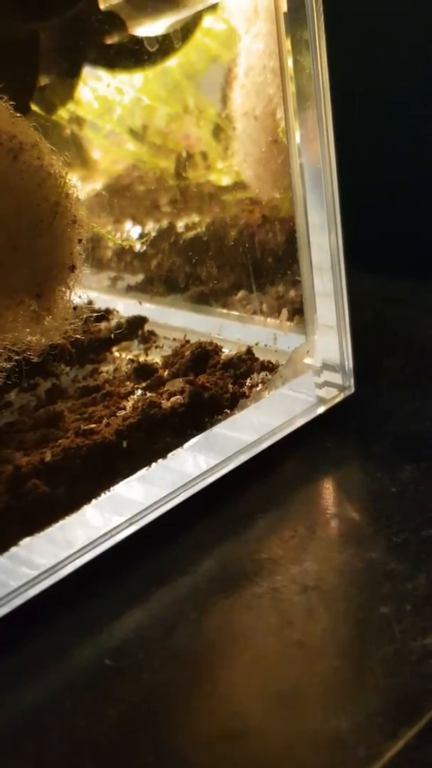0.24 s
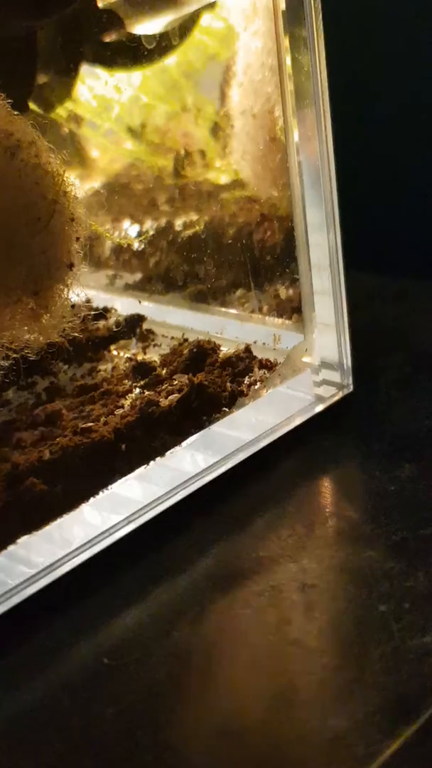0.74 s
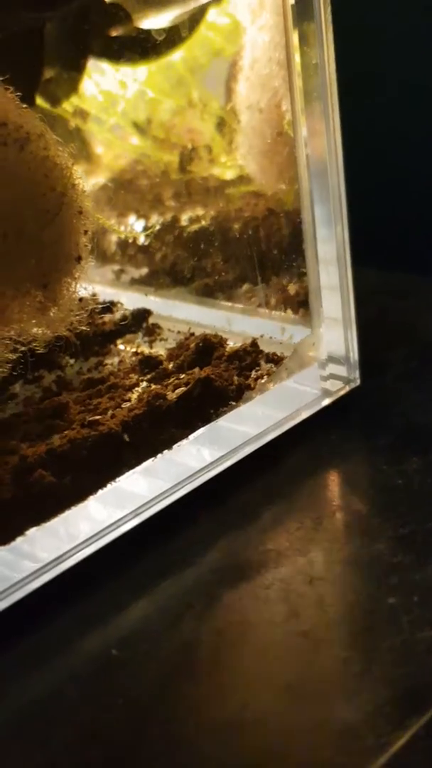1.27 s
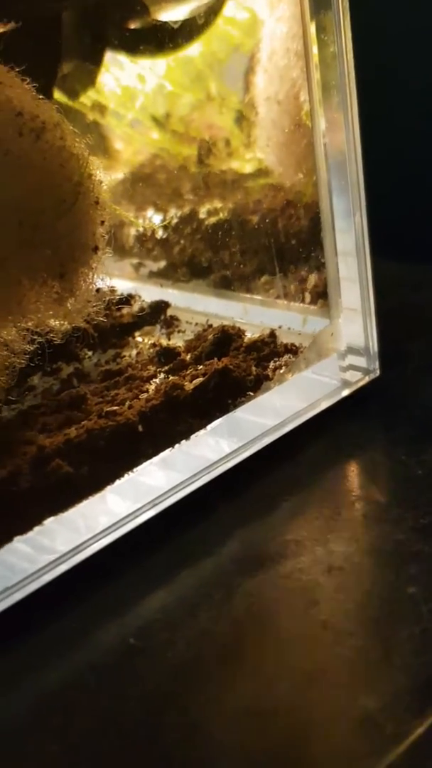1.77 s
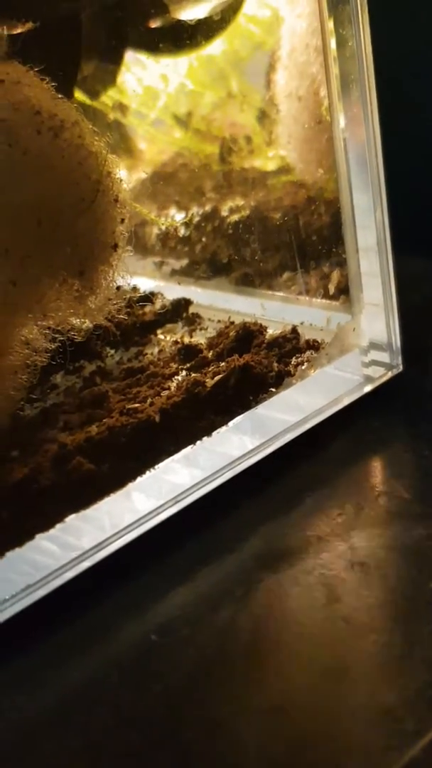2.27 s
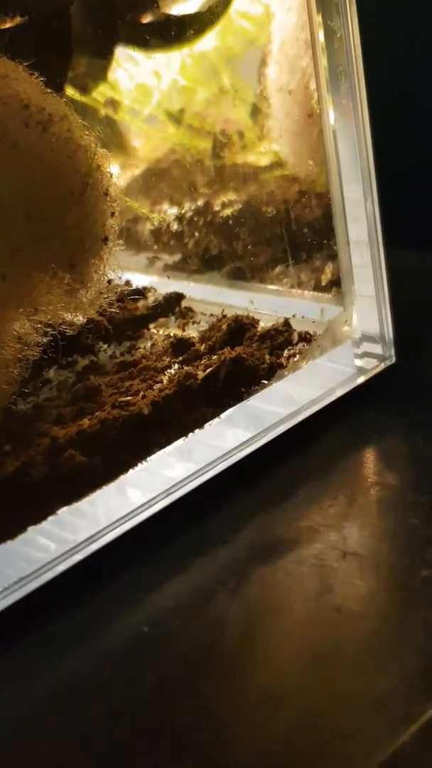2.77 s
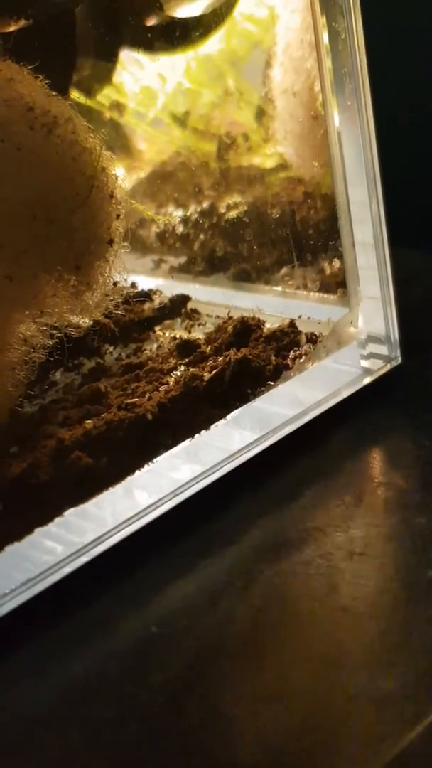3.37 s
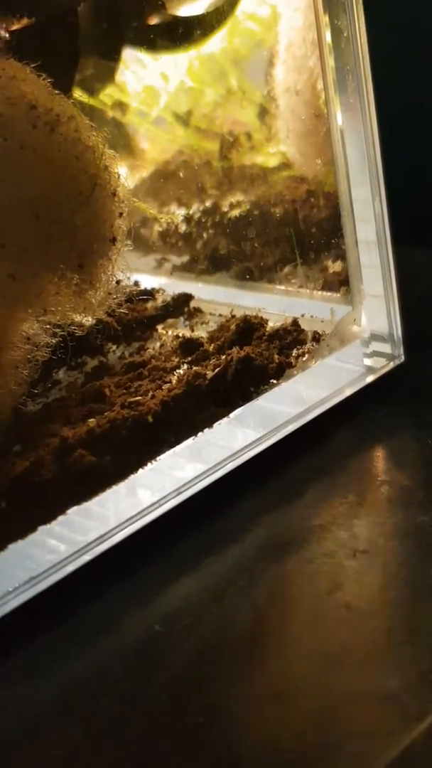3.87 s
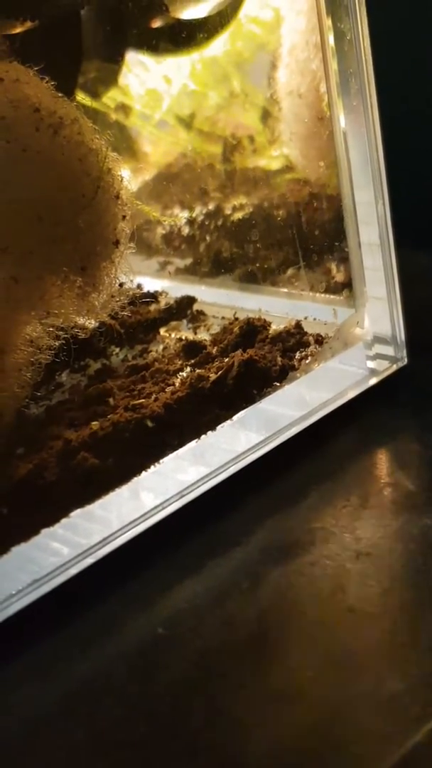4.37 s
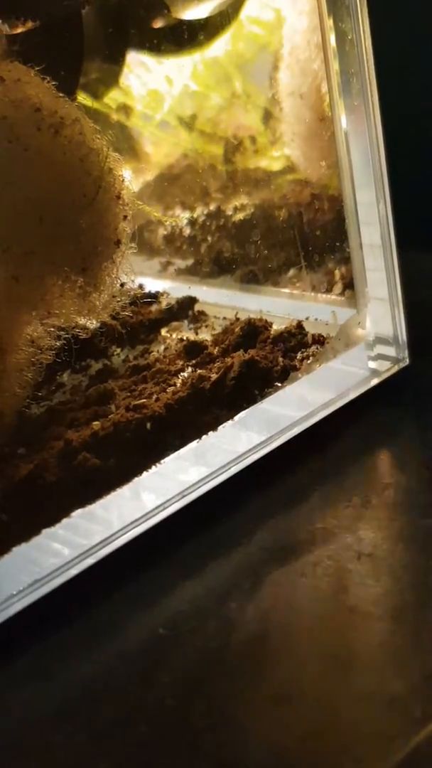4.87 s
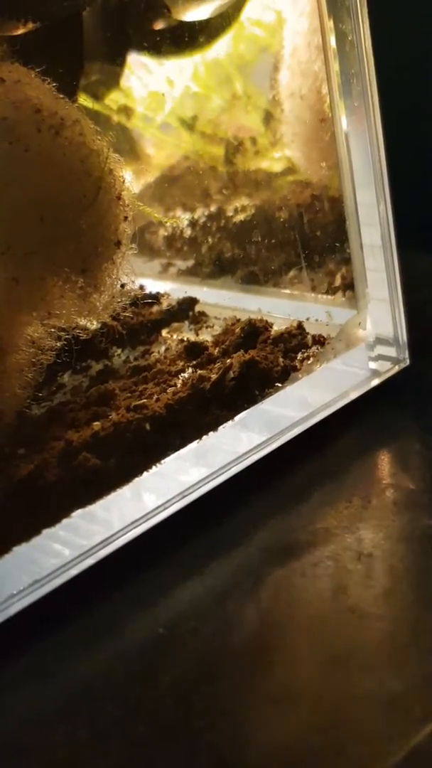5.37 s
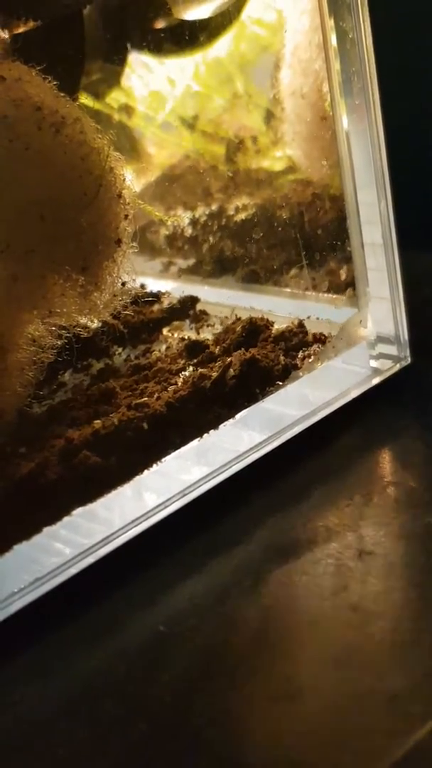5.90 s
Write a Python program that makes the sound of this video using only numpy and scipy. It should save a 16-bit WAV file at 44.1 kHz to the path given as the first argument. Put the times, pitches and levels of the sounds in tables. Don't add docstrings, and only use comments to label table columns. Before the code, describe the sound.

Close, continuous aquarium bubbling with hollow glassy plips and tiny crisp surface pops, while an air pump hums low and steady behind.

```python
import sys
import numpy as np
from scipy import signal
from scipy.fft import rfft, irfft, next_fast_len
from scipy.io import wavfile
from scipy.ndimage import uniform_filter1d, map_coordinates

SR = 44100
rng = np.random.default_rng(int(sys.argv[2]) if len(sys.argv) > 2 else 0)


def materialize(psi):
    bounded = np.clip(np.atleast_2d(psi).T, -1, 1)
    quanta = np.round(bounded * 32767).astype(np.int16)
    wavfile.write(sys.argv[1], SR, quanta)


def rack_gain(trim_db):
    fader = np.asarray(trim_db, float)
    return 10 ** (fader / 20)


N = 270774

# f/Hz, level/dB [per Hz]
STREAM_TONE = [(100, -5.5), (1200, 0), (1500, -4.5), (2400, -3), (3000, -0.5), (8000, -6)]
# t/s, level/dB [peak], f/Hz, life [cycles]
LARGE_BUBBLES = [(0.0, -39.5, 1680, 5.6), (0.047, -38, 1570, 9.1), (0.191, -48, 1680, 16),
                 (0.576, -41.5, 1670, 17), (0.8075, -33, 1650, 8.7), (1.4698, -40, 1550, 13),
                 (1.6033, -47, 1710, 12), (1.692, -41, 4200, 5), (1.7465, -37.5, 2430, 14),
                 (1.978, -37, 2340, 10), (2.0214, -38.5, 1580, 15), (2.3858, -47, 2340, 16),
                 (2.4435, -34, 1730, 27), (2.4942, -38, 2230, 16), (2.6428, -52, 1750, 14),
                 (3.272, -41, 2135, 17), (3.9617, -35, 1730, 22), (4.2063, -45.5, 1460, 13),
                 (4.445, -46, 1850, 16), (4.8474, -42.5, 1476, 14), (5.1588, -43, 1904, 18),
                 (5.4412, -36, 1840, 13), (5.7593, -36.5, 2190, 13), (6.0048, -42.5, 2210, 15),
                 (6.0526, -40, 1595, 9.9)]
# t/s, level/dB [peak], f/Hz
COMPANIONS = [(.811, -41, 1030), (.826, -38, 1460), (1.73, -49, 890), (2.31, -44, 907), (2.501, -43, 1470),
              (3.276, -50, 1960), (3.55, -45, 910), (4.85, -50, 1620), (5.163, -47, 2350),
              (5.446, -45, 2290), (6.075, -45, 1875)]
# t/s, level/dB [peak], f/Hz
SMALL_BUBBLES = [(0.0608, -52.5, 9430), (0.4324, -53.5, 7590), (0.5272, -51, 5120), (0.5671, -50, 4750),
                 (0.7153, -49.5, 3520), (0.867, -50, 3450), (0.9637, -47, 3600), (1.1962, -54, 7260),
                 (1.6127, -48, 3620), (1.7799, -53, 8350), (2.1196, -53, 9300), (2.601, -53, 5250),
                 (2.9941, -51, 6170), (3.43, -48, 9100), (3.552, -42, 2800), (3.556, -49, 2990),
                 (4.0387, -52, 4730), (4.3026, -48, 3680), (4.3655, -51, 3700), (4.8564, -55, 7400),
                 (5.0375, -53, 3640), (5.665, -42.5, 6140), (5.7987, -49.5, 3650)]
# t/s, level/dB [peak], centre f/Hz
BURSTS = [(0.5207, -46, 14300), (0.6749, -50, 13900), (0.7108, -50, 12500), (1.0051, -54, 11500),
          (1.509, -43, 15100), (1.578, -45, 14900), (2.0138, -47, 15100), (2.1006, -48, 15300),
          (2.1221, -46, 14600), (2.2294, -51, 14900), (2.356, -55, 14600), (2.798, -48, 10300),
          (2.9487, -47, 15300), (3.3074, -59, 15700), (3.3503, -53, 15300), (3.4287, -43, 9300),
          (3.6616, -47, 10000), (3.702, -38, 15100), (4.0791, -46.5, 13000), (4.2607, -54, 15500),
          (4.3006, -52, 13100), (4.341, -49, 15500), (4.578, -51, 13500), (4.8564, -50, 9100),
          (4.9286, -44, 13900), (4.9711, -49, 15600), (5.4225, -44, 13300), (5.4494, -49, 15600),
          (5.656, -48.5, 13600), (5.941, -41, 13500)]
PANE_HZ = [108, 226, 350, 441, 590, 845, 904, 996, 1050, 1211, 1308, 1464, 1583, 1631, 1703, 1868, 1940,
           1978, 2186, 2353, 2400, 2487, 2650, 2960, 3278, 3700, 4398, 5120, 6180]
# width f/Hz, left level/dB, right level/dB, right lag [rad]
PANE_MODES = [(19.8, -65, -84, 0.13), (20.6, -63, -66.5, 0.546), (80, -75.5, -88.5, 0.44),
              (19.7, -66.5, -72, 0.24), (38.2, -87, -88, 2.34), (27.778, -72.5, -81.5, 2.3),
              (21.8, -72, -78.5, 3.43), (18.1, -78.5, -79, 3.1), (21.8, -78, -85, 3),
              (15.9, -77.5, -84, 3.6), (30.3, -78, -78, 4.3), (28.5, -80, -80.5, 1.2),
              (10.3, -72.5, -89, 0.39), (15.9, -72, -78.5, 2.7), (24, -68.5, -78.5, 3.56),
              (11.7, -74.5, -82, 4.1), (17.7, -72, -80.5, 2.94), (29.4, -77, -101, 3.4),
              (8.9, -79, -85.5, 5.9), (18, -79.5, -87, .1), (27.7, -83.5, -90, .1),
              (32.407, -96, -80.5, 0.26), (33, -89, -94, 0.66), (50, -90, -88.5, 1.96),
              (86.4, -86.5, -87, 3.6), (89.5, -87.5, -91, 0.68), (61, -86, -100, 2.5),
              (78, -94.5, -94, 0.53), (99, -104, -101, 1.2)]
# f/Hz, level/dB [per Hz]
AIR_LEFT = [(20, -102), (45, -74), (150, -95), (500, -79.5), (1130, -95.5), (1800, -86), (2270, -90.5),
            (3000, -91.5), (6000, -96), (7300, -100), (8300, -108), (9200, -102), (13300, -101),
            (15700, -101.5)]
# f/Hz, level/dB [per Hz]
AIR_RIGHT = [(20, -99), (45, -78), (150, -75.5), (500, -83), (750, -83), (950, -83.5), (1150, -99),
             (3000, -95.5), (6000, -102), (8000, -107), (10200, -113), (12000, -107), (14000, -110),
             (15700, -108)]
# t/s, f/Hz
STROKE_RATE = [(0, 50.077), (2.3, 50.073), (6.14, 50.054)]
# multiple of the stroke rate, left level/dB, right level/dB, left lead [rad]
PUMP_OVERTONES = [(1, -51.2, -56.8, 0.3), (2, -36.7, -35.6, 0.1), (3, -59.1, -57.8, 1.8),
                  (4, -46.5, -47.8, 0.2), (5, -43.2, -48.6, 1.0), (6, -52.5, -63.5, -2.0),
                  (7, -44.4, -48.9, 0.5), (8, -57.3, -62.5, -2.1), (9, -60.3, -72.1, 1.7),
                  (10, -58.3, -62.6, 1.0), (11, -67.3, -60.5, 1.8), (12, -64.1, -59.7, -1.7),
                  (13, -61.2, -67.9, -0.6), (14, -60.0, -65.3, -0.3), (15, -73.1, -73.2, 0.2),
                  (16, -67.9, -70.1, -2.3), (17, -68.2, -62.9, -3.0), (18, -64.1, -66.0, -2.3),
                  (19, -73.2, -73.2, 2.1), (20, -69.3, -68.4, 2.3), (21, -73.1, -83.9, 2.2),
                  (22, -74.9, -88.6, -0.1), (23, -86.8, -87.7, 0.5), (24, -75.5, -83.4, -2.4)]
# f/Hz, level/dB
MOTOR_TONES = [(63.33, -42.5), (75.2, -68), (87.5, -65.5)]

SPAN = 8192


def air_stream():
    puff_db = 1.7 * np.cos(stroke_angle())
    drive = rack_gain(-0.57 + 1.2 * wobble(12) + puff_db) * patchy_noise(2.37, channels=1)
    ringing = filtered(drive, lambda hz: panes(hz) * rack_gain(np.interp(hz, *np.transpose(STREAM_TONE))))

    def alike(hz):
        return 1 / (1 + (hz / 450) ** 2)

    fizz = rack_gain(-0.53 + 0.39 * wobble(9)) * patchy_noise(2.0, channels=2)
    separate = filtered(fizz, lambda hz: np.sqrt(1 - alike(hz)))
    shared = filtered(fizz[0], lambda hz: np.sqrt(alike(hz)))[None, ::-1]
    return ringing + filtered(separate + shared, air)


def bubbles(rows, echo_db, t60, rise_s):
    out = np.zeros((2, N + SPAN))
    t = np.arange(SPAN) / SR
    start_s, peak_db, hz, life_cycles = np.transpose(rows)[..., None, None]
    rising = np.sin(2 * np.pi * hz * t * (0.995 + 0.0002 * hz * t))
    tone = rising * rack_gain(-20 * hz * t / life_cycles) * (1 - np.exp(-t / rise_s))
    echoes = rfft(rng.standard_normal((len(rows), 2, SPAN)) * rack_gain(-60 * t / t60), 2 * SPAN)
    f = np.fft.rfftfreq(2 * SPAN, 1 / SR)
    path = panes(f) + rack_gain(echo_db) * air(f) * echoes
    heard = irfft(rfft(tone, 2 * SPAN) * path)[..., :SPAN]
    for s, db, sound in zip(start_s.ravel(), peak_db.ravel(), heard):
        add_event(out, max(s - 0.0025, 0), sound, db - 2.0)
    return out[:, :N]


def large_bubbles():
    murmur = swarm(count=12, top_db=-52, spread_db=5.5, mid_hz=1800, octaves=0.25, smaller_db=0)
    rows = LARGE_BUBBLES + same_life(COMPANIONS + list(murmur), cycles=12.5)
    return bubbles(rows, echo_db=-36, t60=0.25, rise_s=0.0006)


def small_bubbles():
    crowd = swarm(count=170, top_db=-51.5, spread_db=3.5, mid_hz=3210, octaves=2.21, smaller_db=-7.5)
    rows = same_life(SMALL_BUBBLES, cycles=19) + same_life(crowd, cycles=13)
    return bubbles(rows, echo_db=-16, t60=0.09, rise_s=0.00021)


def surface_bursts():
    out = np.zeros((2, N + SPAN))
    t = np.arange(SPAN) / SR
    envelope = (rack_gain(-60 * t / 0.16) + 0.8 * rack_gain(-60 * t / 0.025)) * (1 - np.exp(-t / 0.0022))
    faint = swarm(count=30, top_db=-54, spread_db=3.5, mid_hz=14200, octaves=0.29, smaller_db=-2.5)
    for s, db, hz in BURSTS + list(faint):
        louder_db, higher_khz = db + 47, (hz - 13500) / 1000
        pan_db = 12 + 0.1 * louder_db + 0.6 * higher_khz
        skirt_db = -3.5 - 0.1 * louder_db - 1.7 * higher_khz

        def band(f):
            own_pitch = resonance(f, hz, 0.13 * hz) ** 2
            skirt = rack_gain(skirt_db) * resonance(f, 12400, 6000)
            return (own_pitch + skirt) * air(f)[0] * (f > 5000)

        spray = filtered(rng.standard_normal((2, SPAN)) * envelope, band)
        add_event(out, max(s - 0.002, 0), rack_gain([[pan_db / 2], [-pan_db / 2]]) * spray, db + 0.12)
    return out[:, :N]


def swarm(count, top_db, spread_db, mid_hz, octaves, smaller_db):
    late, size, pitch = rng.random((count, 3)).T
    s = (np.arange(count) + late) / count * N / SR
    level_db = top_db + smaller_db * pitch - spread_db * size
    return np.c_[s, level_db, mid_hz * 2 ** (octaves * (pitch - 0.5))]


def same_life(rows, cycles):
    return [(*row, cycles) for row in rows]


def resonance(f, centre_hz, width_hz):
    return 1j * f * width_hz / (centre_hz ** 2 - f * f + 1j * f * width_hz)


def panes(hz):
    total = 0
    for k, (centre, (width, left_db, right_db, lag)) in enumerate(zip(PANE_HZ, PANE_MODES)):
        delay = np.exp(-1j * np.outer([0, lag], hz / centre))
        total = total + (-1) ** k * rack_gain([[left_db], [right_db]]) * delay * resonance(hz, centre, width)
    return total


def air(hz):
    ports = []
    for table in (AIR_LEFT, AIR_RIGHT):
        corner_hz, level_db = np.transpose(table)
        ports.append(np.interp(np.log(hz + 1), np.log(corner_hz), level_db))
    return rack_gain(ports)


def stroke_angle():
    rate_hz = np.interp(np.arange(N) / SR, *np.transpose(STROKE_RATE))
    return 1.75 + 2 * np.pi * np.cumsum(rate_hz) / SR


def pump_hum():
    angle = stroke_angle()
    hum = np.zeros((2, N))
    for multiple, left_db, right_db, lead in PUMP_OVERTONES:
        phase = 0.45 * rng.standard_normal() + 2.2 - np.array([[0], [lead]])
        hum += rack_gain([[left_db], [right_db]]) * np.cos(multiple * angle + phase)
    return np.sqrt(2) * hum


def motor_drone():
    t = np.arange(N) / SR
    return np.sqrt(2) * sum(rack_gain(db + 0.66 * wobble(3.3)) * np.sin(2 * np.pi * hz * t)
                            for hz, db in MOTOR_TONES)


def unit(x):
    return x / np.sqrt(np.mean(x ** 2) + 1e-20)


def wobble(rate):
    knots = rng.standard_normal(int(N * rate / SR) + 4)
    return map_coordinates(knots, [np.arange(N) * rate / SR])


def patchy_noise(patchy_db, channels):
    z = signal.stft(rng.standard_normal((channels, N)), nperseg=256)[2]
    field = uniform_filter1d(rng.standard_normal(z.shape[1:]), size=6, axis=0)
    field = uniform_filter1d(field, size=10, axis=1)
    noise = signal.istft(z * rack_gain(patchy_db * unit(field)), nperseg=256)[1][:, :N]
    return unit(noise) * np.sqrt(SR / 2)


def filtered(x, response):
    m = next_fast_len(x.shape[-1] + SPAN)
    return irfft(rfft(x, m) * response(np.fft.rfftfreq(m, 1 / SR)), m)[..., :x.shape[-1]]


def add_event(out, s, sound, db):
    mid_peak = np.abs(sound.mean(axis=0)).max()
    out[:, round(s * SR):][:, :SPAN] += rack_gain(db) * sound / mid_peak


def scene():
    near = air_stream() + large_bubbles() + small_bubbles() + surface_bursts()
    return near + pump_hum() + motor_drone()


def low_pass(x):
    return signal.sosfilt(signal.butter(12, 15900, fs=SR, output="sos"), x)


def record(dry):
    mix = filtered(dry, lambda hz: hz < 15800)
    return low_pass(mix)


dry = scene()
out = record(dry)
materialize(out)
```